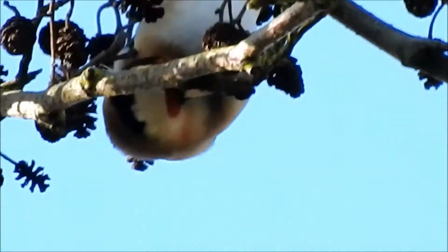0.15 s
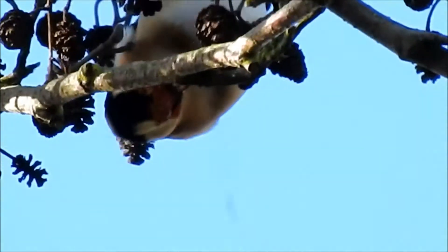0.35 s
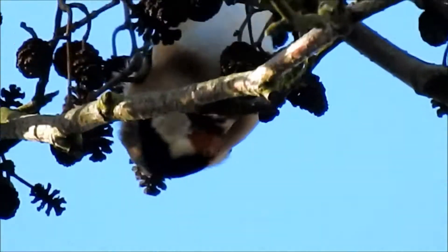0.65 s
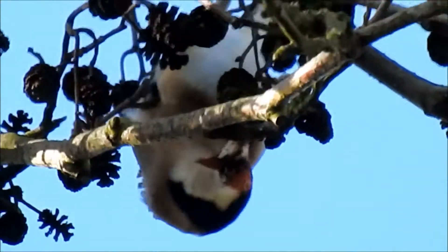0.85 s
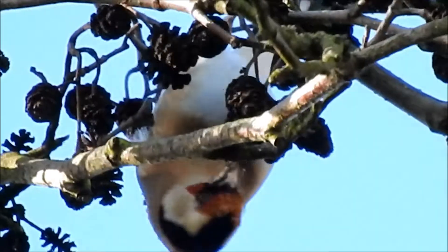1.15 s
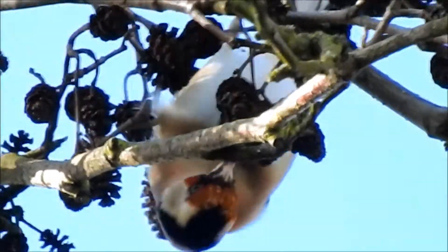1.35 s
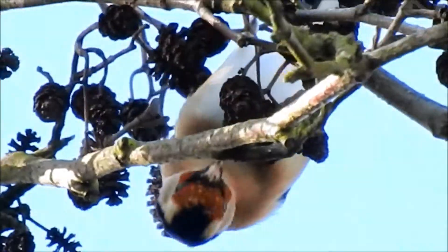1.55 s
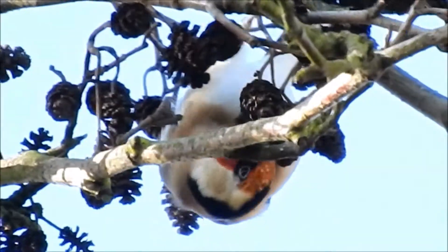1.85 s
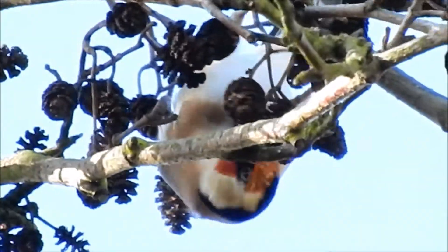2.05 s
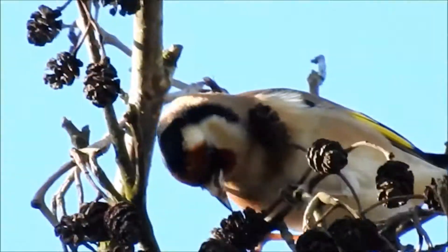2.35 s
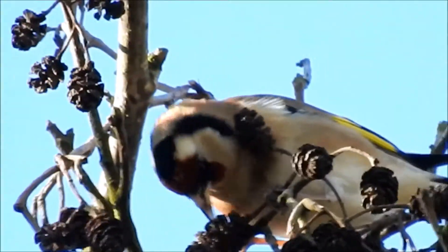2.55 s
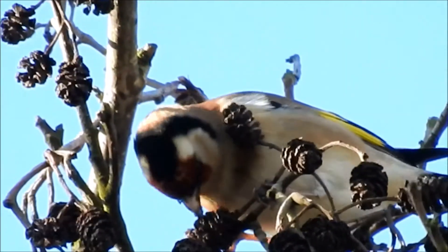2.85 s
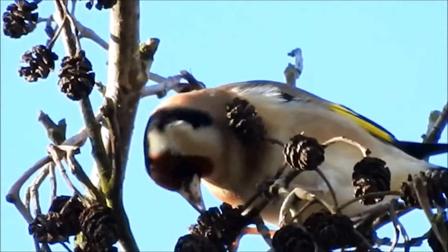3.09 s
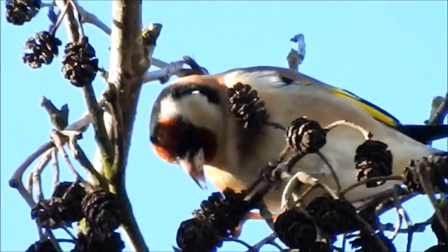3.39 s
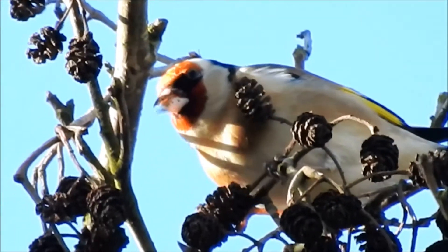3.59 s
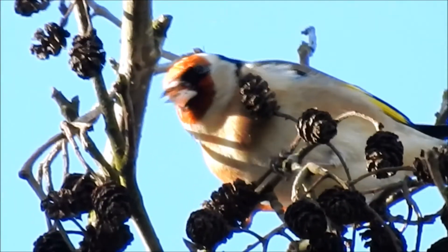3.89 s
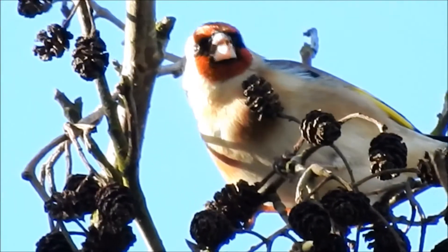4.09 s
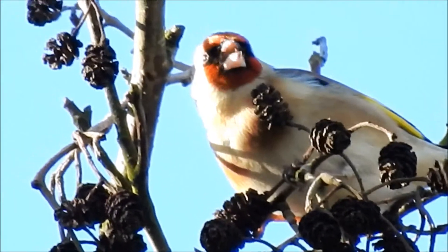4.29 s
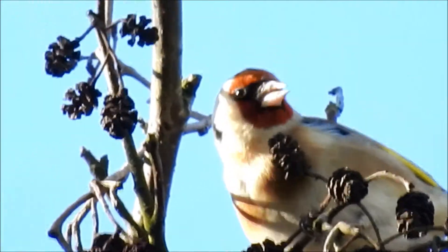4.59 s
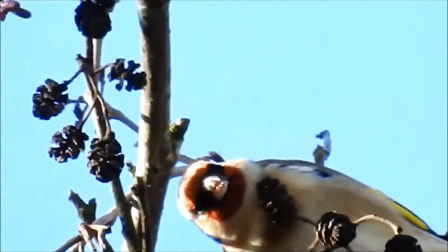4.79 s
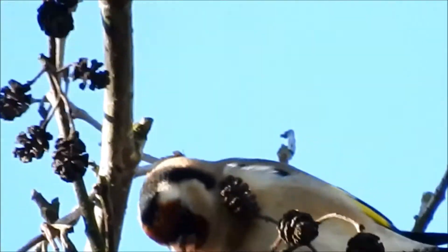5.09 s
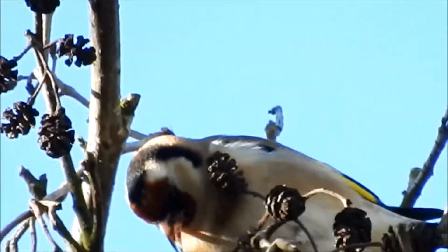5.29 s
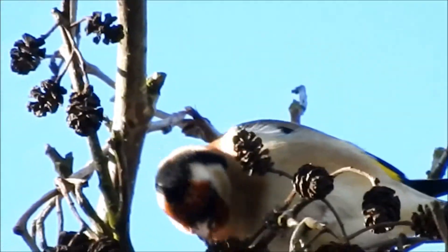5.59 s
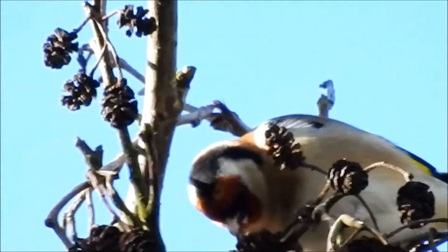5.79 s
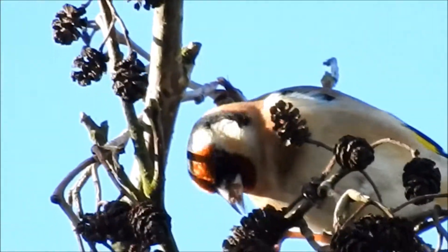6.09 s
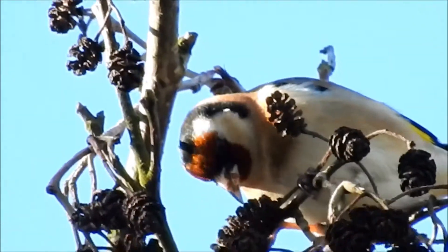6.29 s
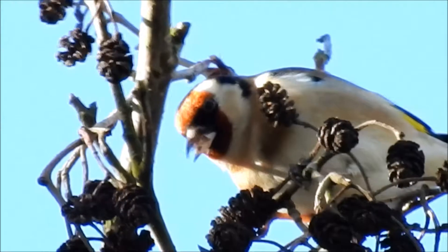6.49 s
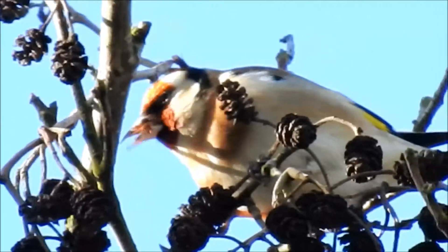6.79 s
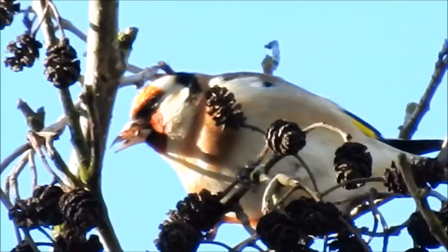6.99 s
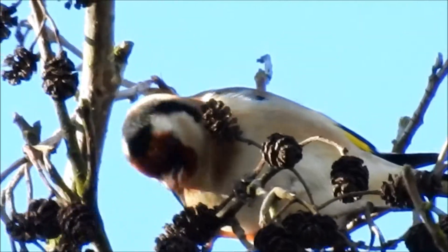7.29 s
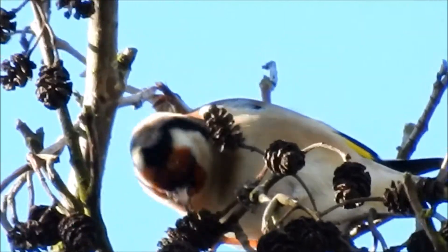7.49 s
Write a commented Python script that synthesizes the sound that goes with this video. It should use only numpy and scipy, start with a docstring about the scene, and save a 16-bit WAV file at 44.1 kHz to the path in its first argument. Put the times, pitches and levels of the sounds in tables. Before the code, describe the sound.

A small bird repeats a quick two-note high song over distant traffic hum, fades to silence, then sparse thin calls and trills slowly return.

```python
"""Small birds call in winter trees over the hum of distant traffic and a soft hiss of air.
A tit repeats a two-note song, a goldfinch snaps seeds out of alder cones, and finches give scattered
thin calls and trills; the sound fades to silence and back. Each voice is a trembling sine with a
gliding pitch, each snap a noise burst and a damped ring, and road and air are shaped noise.
Echoes from trunks and twigs follow every note."""
import sys
import numpy as np
from scipy import signal
from scipy.fft import rfft, irfft
from scipy.io import wavfile
from scipy.ndimage import uniform_filter1d

SR = 44100
rng = np.random.default_rng(int(sys.argv[2]) if len(sys.argv) > 2 else 0)


def log_audio(samples):
    """Write samples as a 16-bit WAV file to the path given in sys.argv[1]."""
    # one column per channel
    frames = np.atleast_2d(samples).T
    # limit to full scale, then quantise
    limited = np.clip(frames, -1, 1)
    pcm = np.round(limited * 32767).astype(np.int16)
    wavfile.write(sys.argv[1], SR, pcm)


N = 337365
TIME = np.arange(N) / SR
FADE_OUT_S, CUT_S, SILENT_S, RESUME_S, FADED_IN_S = .1, 2.228, 2.27, 2.318, 4.5


def undb(db):
    """Level is logarithmic: 20 dB is a tenfold amplitude."""
    return 10 ** (np.asarray(db) / 20)


def curve(rows, t):
    """Linear interpolation of each column of a table against its first column."""
    knots, *columns = np.transpose(rows)
    return [np.interp(t, knots, column) for column in columns]


def add(out, s, sound, pan_db):
    """Superposition: mix a mono sound into both channels at s seconds, panned by a level difference."""
    start = int(s * SR)
    a, b = max(start, 0), min(start + len(sound), N)
    pan_gains = undb(np.array([[pan_db], [-pan_db]]) / 2)
    out[:, a:b] += pan_gains * sound[a - start:b - start]


def walk(rate):
    """Slow random modulation: random steps, rate per second, smoothed twice and scaled to a spread of 1."""
    hold = int(SR / rate)
    steps = np.repeat(rng.standard_normal(N // hold + 1), hold)
    steps = uniform_filter1d(uniform_filter1d(steps, hold), hold)[:N]
    return steps / steps.std()


def hump(peak_s, width_s):
    """A Gaussian rise to 1 and back."""
    return np.exp(-((TIME - peak_s) / width_s) ** 2)


def wash(spectrum):
    """Diffuse-field coherence: noise of rms 1, alike in both channels in the bass, barely in the treble."""
    # the two microphones: frequency_hz, correlation (0-1), left_minus_right_db
    ports = [(60, .984, 0), (300, .96, 0), (850, .93, 0), (1100, .88, 4.7), (1600, .84, 3.5),
             (2700, .75, 3), (3500, .8, 4.5), (4700, .5, .5), (6600, .25, 0), (12000, .05, 0)]
    log_hz = np.log(np.maximum(np.fft.rfftfreq(N, 1 / SR), 1))
    db, = curve([(np.log(f), d) for f, d in spectrum], log_hz)
    alike, pan_db = curve([(np.log(f), c, p) for f, c, p in ports], log_hz)
    mid, side = rfft(rng.standard_normal((2, N)))
    sign = np.array([[1], [-1]])
    # shared and opposed parts, weighted to give the wanted correlation
    channels = mid * np.sqrt(1 + alike) + sign * side * np.sqrt(1 - alike)
    x = irfft(channels * undb(db + sign * pan_db / 2), N)
    return x / x.std()


def patches(x, depth_db, full_hz=400, size=4096):
    """Multipath fading: shifting paths make narrow bands swell and sink on their own, long waves least."""
    hz, _, bands = signal.stft(x, SR, nperseg=size)
    field = rng.standard_normal(bands.shape[1:])
    field = uniform_filter1d(field, size=4, axis=0)  # over frequency
    field = uniform_filter1d(field, size=2, axis=1)  # over time
    depth = depth_db * np.minimum(hz / full_hz, 1)[:, None]
    db = depth * field / field.std()
    y = signal.istft(bands * undb(db), nperseg=size)[1][:, :N]
    return y / y.std()


def swell(x, lo_hz, hi_hz, db):
    """Band emphasis: add a zero-phase filtered band back to the sound along a level curve."""
    sos = signal.butter(2, [lo_hz, hi_hz], "band", fs=SR, output="sos")
    band = signal.sosfiltfilt(sos, x)
    return x + band * (undb(db) - 1)


def from_left(x, lag):
    """Interaural-type delay: sound from the left reaches the right microphone lag samples later."""
    delay = np.exp(-2j * np.pi * np.fft.rfftfreq(N) * lag)
    return np.array([x[0], irfft(rfft(x[1]) * delay, N)])


def outdoors(surge_db=.5, road_patchy_db=3.5, air_patchy_db=2.5, drone_surge_db=0.5):
    """Broadband noise sources: engines drone and tyres roar on a far road; air hisses above them."""
    # traffic spectra before and after the silence: frequency_hz, relative_density_db
    traffic_first = [(59, -28), (100, 0), (124, -4.5), (232, -2), (287, -11), (317, -4), (433, -7.5),
                     (472, -5), (568, -9.5), (654, -5.5), (723, -11), (1170, -3.5), (1580, -16),
                     (3000, -27.5), (3900, -48), (6600, -120)]
    traffic_later = [(59, -30), (100, -2), (124, -4.5), (182, 2), (263, -3), (335, -0.5), (433, -5),
                     (609, -3.5), (744, -6), (895, -7.5), (1030, -2), (1160, -2.5), (1330, -4.5),
                     (1600, -15), (3000, -25), (3900, -44), (6600, -120)]
    # air spectra before and after the silence: frequency_hz, relative_density_db
    air_first = [(2200, -34), (2800, -15), (3500, 11.5), (3950, 2.5), (4500, 7.5), (6600, 2), (8000, -9.5),
                 (10000, -14.5), (15500, -25)]
    air_later = [(2200, -18.5), (2800, -20.5), (3150, 3), (3500, 7.5), (3750, 5.5), (3980, -2), (4350, 4),
                 (5000, 2.5), (6000, 5), (6750, 4), (7400, -3.5), (8500, -12), (10500, -18.5), (15500, -29)]
    # spectrum of the deep drone of engines: frequency_hz, relative_density_db
    drone_spectrum = [(20, -44.5), (32, -18.5), (45, -18), (55, -2), (63, 0), (71, -2.5), (79, 1),
                      (88, -7.5), (100, -9.5), (125, -25), (400, -62.5)]

    later = TIME > SILENT_S
    traffic_db = np.where(later, -39.5, -40.5) + surge_db * walk(18)
    drone_db = np.where(later, -44, -47) + drone_surge_db * walk(2.9)
    # a car comes nearer and its tyres roar more
    tyre_db = -1.5 + 2.5 * hump(peak_s=6.83, width_s=1.03)
    # one slow gust lifts the hiss; its top brightens for a shorter while
    air_db = -56.5 + 2.6 * hump(peak_s=5.7, width_s=2.6)
    bright_db = -2.5 + 5.5 * hump(peak_s=4.62, width_s=1.7)

    road = patches(np.where(later, wash(traffic_later), wash(traffic_first)), road_patchy_db)
    road = swell(road, lo_hz=910, hi_hz=1470, db=tyre_db) * undb(traffic_db)
    air = patches(np.where(later, wash(air_later), wash(air_first)), air_patchy_db)
    air = swell(air, lo_hz=4400, hi_hz=8000, db=bright_db) * undb(air_db)
    drone = wash(drone_spectrum) * undb(drone_db)
    return road + drone + from_left(air, lag=1.26)


def envelope(t, length, attack, release):
    """Amplitude envelope: attack, hold and release along quarter sines."""
    return np.sin(np.pi / 2 * np.clip(np.minimum(t / attack, (length - t) / release), 0, 1))


def progress(length):
    """Normalised time: 0 to 1 over a call of length seconds."""
    return np.linspace(0, 1, int(length * SR))


def whistle(hz, gain, waver=0.0032):
    """The syrinx as an oscillator: phase integrates a trembling pitch, and the strength trembles too."""
    flutter_db = 1.1
    step = SR // 250  # a new random value about every 4 ms
    samples = np.arange(len(hz))
    knots = np.arange(0, len(hz) + step, step)
    pitch, push = (np.interp(samples, knots, r) for r in rng.standard_normal((2, len(knots))))
    phase = 2 * np.pi * np.cumsum(hz * (1 + waver * pitch)) / SR
    return np.sqrt(2) * gain * undb(flutter_db * push) * np.sin(phase)


def tit(pan_db=3.5, waver=0.0038):
    """Exponential pitch relaxation: a low note that steps up, then a high one that falls to its pitch."""
    # song phrases: start_s, level_db
    phrase_table = [(-.016, -43.5), (.285, -41), (.586, -39.5), (.887, -39), (1.196, -41.5), (1.509, -41),
                    (1.833, -40)]
    # parts of a phrase, the low note in two steps and then the high note: delay_s, length_s, first_hz,
    # settled_hz, settling_time_s, attack_s, release_s, level_db (relative to the phrase)
    note_table = [(0, .054, 3930, 4105, .016, .018, .018, -4),
                  (.038, .072, 4130, 4222, .012, .022, .036, 0),
                  (.104, .08, 5720, 4890, .025, .004, .012, -10.5)]
    pitch_scatter = .004  # relative spread; each phrase shifts all its nominal pitches together
    out = np.zeros((2, N))
    for (s, db), chance in zip(phrase_table, rng.standard_normal(len(phrase_table))):
        for delay, length, first, settled, settle_s, attack, release, note_db in note_table:
            t = np.arange(int(length * SR)) / SR
            hz = settled + (first - settled) * np.exp(-t / settle_s)
            hz = hz * (1 + pitch_scatter * chance)
            gain = undb(db + note_db) * envelope(t, length, attack, release)
            add(out, s + delay, whistle(hz, gain, waver), pan_db)
    return out


def slurs(waver):
    """Parabolic frequency glide: calls that move quickly at first and level off near their end."""
    # start_s, length_s, first_hz, turn_hz, level_db, left_minus_right_db
    slur_table = [ (.015, .021, 6540, 6150, -50.5, 0), (.016, .02, 7450, 7220, -58, 5),
                  (.021, 0.032, 5070, 5550, -57, 3), (0.17, 0.05, 5250, 5540, -51.5, 3),
                  (.342, 0.042, 6000, 5800, -48.5, 6), (.347, .038, 4850, 4710, -56, 3),
                  (.825, .04, 5340, 5570, -56, 6), (0.903, .04, 4400, 4480, -54, 3),
                  (1.0, 0.099, 3930, 3740, -57, 3), (1.47, .043, 3720, 3570, -54, 5),
                  (1.588, .075, 3880, 3750, -54, 1), (1.828, 0.036, 4720, 4460, -49, 3),
                  (3.003, .097, 5800, 5500, -48.5, -5), (3.235, .072, 4080, 4560, -52, 4),
                  (4.81, .12, 5100, 5430, -62, 5), (5.166, .012, 6400, 7150, -54, 7),
                  (5.33, .02, 5840, 5420, -55, 6), (6.801, .086, 5940, 5480, -50, 10),
                  (6.88, 0.016, 5400, 5660, -49.5, 6), (7.354, 0.057, 4240, 4400, -57, 4),
                  (7.39, 0.019, 6440, 5900, -51.5, 8)]
    turn_at, attack, release = .92, .5, .15  # shares of the length
    out = np.zeros((2, N))
    for s, length, first, turn, db, pan_db in slur_table:
        u = progress(length)
        hz = turn + (first - turn) * (1 - u / turn_at) ** 2
        gain = undb(db) * envelope(u, 0.97, attack, release)
        add(out, s, whistle(hz, gain, waver), pan_db)
    return out


def flock(count=6, pan_db=3):
    """Random superposition: faint short gliding notes of birds farther off, all begun before the silence."""
    lo_hz, hi_hz, glide, note_s, level_db = 4250, 5400, .05, .04, -59  # glide: largest relative change
    out, u = np.zeros((2, N)), progress(note_s)
    for when, pitch, slope in rng.random((count, 3)):
        start_hz = lo_hz + pitch * (hi_hz - lo_hz)
        hz = start_hz * (1 + glide * (2 * slope - 1) * u)
        add(out, when * CUT_S, whistle(hz, undb(level_db) * np.sin(np.pi * u)), pan_db)
    return out


def beak(glide=0.51, glide_s=0.00036, crack_s=0.0015, crack_lo_hz=2200, crack_hi_hz=8500, pan_db=1):
    """Impulsive excitation: each snap is a dry crack of noise and a damped ring that drops in pitch."""
    # the beak snapping at the cones: start_s, level_db, settled_ring_hz, crack_db (sets crack against ring)
    snap_table = [(.2539, -41.5, 6100, -6), (0.667, -44, 6100, -6), (1.2554, -33, 4190, 3),
                  (1.3948, -55, 6500, -9), (1.453, -41, 6800, -1), (1.543, -44, 5840, -23),
                  (1.755, -54, 6800, -10), (1.869, -46, 6250, -6), (5.25, -42, 4320, -5)]
    ring_s = .0018  # decay time constant
    out, t = np.zeros((2, N)), np.arange(SR // 40) / SR
    band = signal.butter(2, [crack_lo_hz, crack_hi_hz], "band", fs=SR, output="sos")
    for s, db, hz, crack_db in snap_table:
        phase = 2 * np.pi * np.cumsum(hz * (1 + glide * np.exp(-t / glide_s))) / SR
        ring = np.sin(phase) * np.exp(-t / ring_s) * (1 - np.exp(-t / glide_s))
        burst = rng.standard_normal(len(t)) * np.exp(-t / crack_s)
        crack = signal.sosfilt(band, burst)
        add(out, s, 2 * undb(db) * (ring + undb(crack_db) * crack), pan_db)
    return out


def chips(pan_db=5, waver=.022):
    """Power-law upward sweep: sharp calls flicked up from one low pitch, with a rough tremble."""
    # start_s, length_s, top_hz, level_db
    chip_table = [(0.574, 0.025, 3970, -49), (2.707, 0.025, 4000, -50), (2.947, .02, 4350, -56),
                  (3.202, 0.034, 3380, -53), (4.822, .016, 3920, -54), (7.126, 0.014, 4200, -48.5),
                  (7.283, 0.019, 3780, -47), (7.472, 0.027, 4970, -48)]
    from_hz, bend = 3180, 1.9  # bend: power of the glide
    attack, release = 0.13, 0.62  # shares of the length
    out = np.zeros((2, N))
    for s, length, top, db in chip_table:
        u = progress(length)
        hz = top + (from_hz - top) * (1 - u) ** bend
        gain = undb(db) * envelope(u, 1, attack, release)
        add(out, s, whistle(hz, gain, waver), pan_db)
    return out


def seeps(waver):
    """Power-law downward sweep: thin high calls that nearly hold their pitch and then drop."""
    # start_s, length_s, first_hz, drop_hz, level_db, left_minus_right_db
    seep_table = [ (2.54, .048, 7650, 620, -55, -4), (5.158, 0.083, 5800, 330, -57, 0),
                  (5.19, .016, 7160, 750, -53, 7), (5.28, .044, 7000, 1030, -49.5, 9),
                  (5.646, .04, 7000, 430, -52, 5)]
    bend, attack, release = 1.73, .3, .3  # power of the glide; shares of the length
    out = np.zeros((2, N))
    for s, length, first, drop, db, pan_db in seep_table:
        u = progress(length)
        hz = first - drop * u ** bend
        gain = undb(db) * envelope(u, 1, attack, release)
        add(out, s, whistle(hz, gain, waver), pan_db)
    return out


def trills(pan_db=6):
    """Sinusoidal frequency modulation: pitch swings up and down while the level follows the same cycle."""
    # first_crest_s, crests, rate_hz, first_centre_hz, last_centre_hz, swing_hz, level_db (at a crest),
    # dip_db (between crests; a negative dip is a rise)
    trill_table = [ (5.429, 4, 34, 5940, 6490, 336, -45.5, 19),
                   (5.692, 6, 33.2, 6920, 6760, 380, -58.5, -6), (6.389, 2, 33, 7240, 6860, 430, -58.5, -2)]
    out = np.zeros((2, N))
    for s, crests, rate, first, last, swing, db, dip_db in trill_table:
        t = np.arange(-.5 / rate, (round(crests) - .5) / rate, 1 / SR)
        crest = np.cos(2 * np.pi * rate * t)
        hz = np.linspace(first, last, len(t)) + swing * crest
        gain = undb(db - dip_db * (1 - crest) / 2) * signal.windows.tukey(len(t), .25)
        add(out, s + t[0], whistle(hz, gain), pan_db)
    return out


def finches(waver=0.0047):
    """Superposition of the nearer calls: slurs, chips, thin seeps and trills."""
    return slurs(waver) + chips() + seeps(waver) + trills()


def boughs(x, db, count=8):
    """Comb filtering: separate early echoes at each microphone beat against a glide and ripple its level."""
    near_s, far_s = .004, .04  # span of the echo delays
    out = x.copy()
    for places in rng.random((count, 2)):
        for ear, place in enumerate(places):
            lag = int((near_s + place * (far_s - near_s)) * SR)
            out[ear, lag:] += undb(db) / np.sqrt(count) * x[ear, :-lag]
    return out


def trees(x, wet_db, t60, build_s=0.0075):
    """Reverberation by convolution: echoes from trunks and twigs gather, then decay 60 dB in t60 seconds."""
    t = np.arange(SR) / SR
    decay = np.exp(-np.log(1000) * t / t60)
    echoes = rng.standard_normal((2, len(t))) * decay * (1 - np.exp(-t / build_s))
    echoes = echoes + echoes[::-1] / 2  # the close microphones share much of each echo
    echoes /= np.sqrt(np.sum(echoes ** 2, axis=1, keepdims=True))
    return x + undb(wet_db) * signal.fftconvolve(x, echoes, axes=1)[:, :N]


def scene():
    """Distance by reverberant level: far tit and flock, nearer finches and feeding bird, over the road."""
    song = trees(boughs(tit() + flock(), db=-9), wet_db=-7, t60=.9)
    calls = trees(boughs(from_left(finches(), lag=.9), db=-15), wet_db=-13, t60=.5)
    snaps = trees(beak(), wet_db=-27, t60=0.14)
    return song + calls + snaps + outdoors()


def record(dry):
    """Linear gain and band limiting: a fade to a moment of silence and back, with the top cut."""
    fader = np.interp(TIME, [FADE_OUT_S, SILENT_S, FADED_IN_S], [1, 0, 1])
    fader = fader * ((TIME < CUT_S) | (TIME > RESUME_S))
    top_cut = signal.ellip(10, .1, 70, 15700, fs=SR, output="sos")  # order, ripple dB, stopband dB, Hz
    return signal.sosfilt(top_cut, dry * fader)


dry = scene()
out = record(dry)
log_audio(out)
```